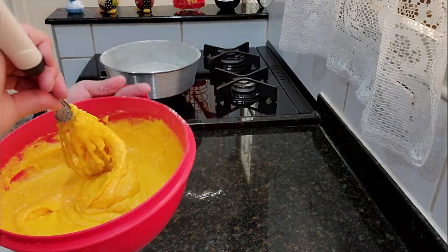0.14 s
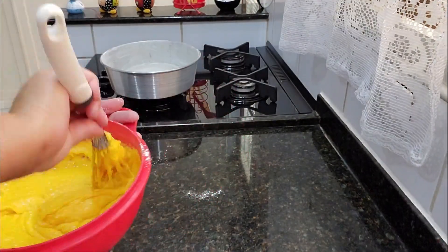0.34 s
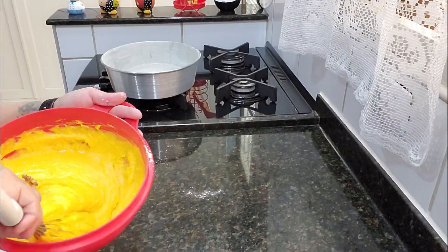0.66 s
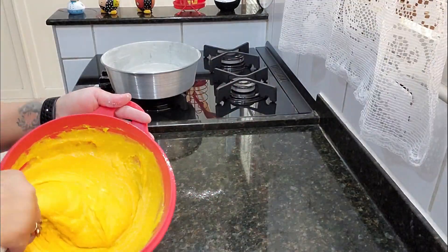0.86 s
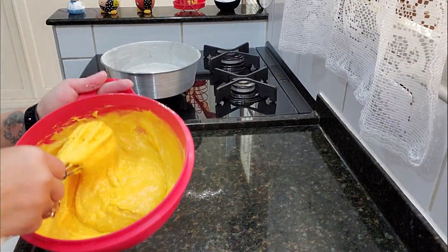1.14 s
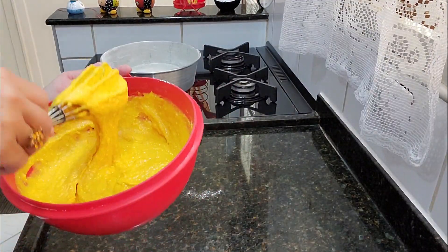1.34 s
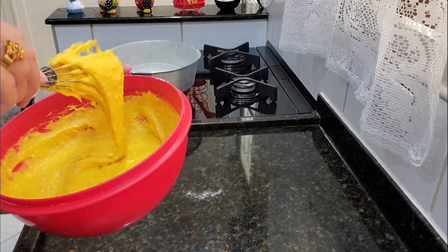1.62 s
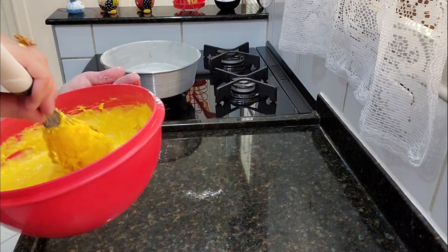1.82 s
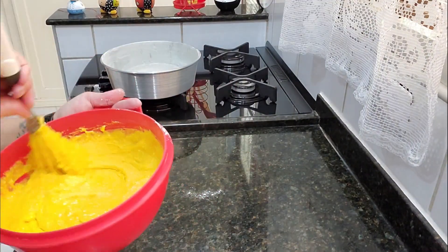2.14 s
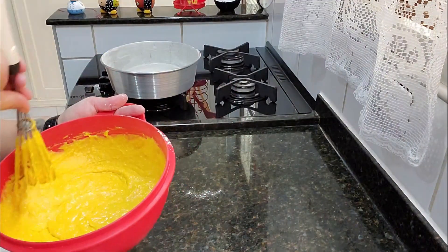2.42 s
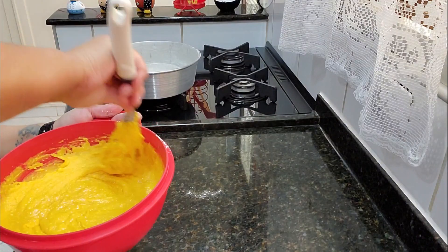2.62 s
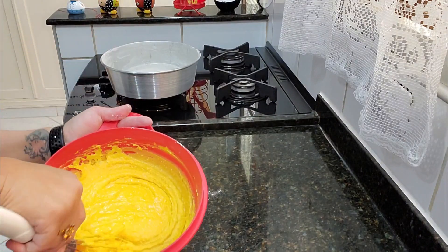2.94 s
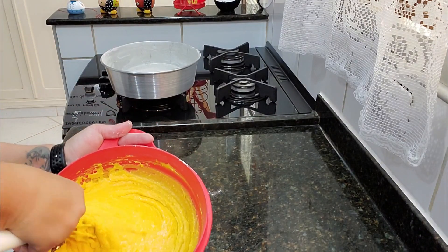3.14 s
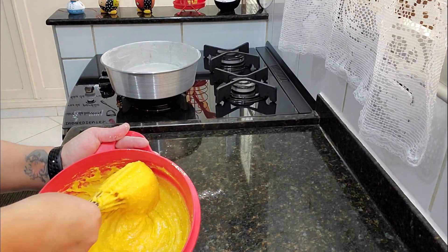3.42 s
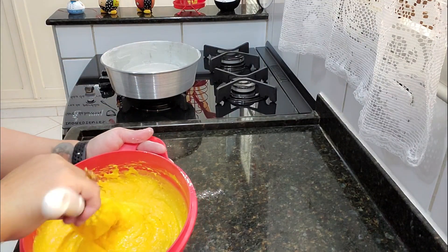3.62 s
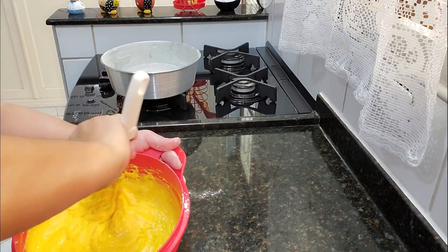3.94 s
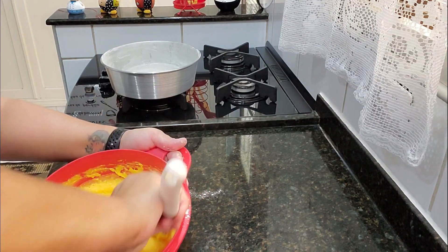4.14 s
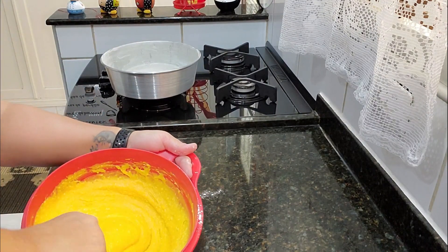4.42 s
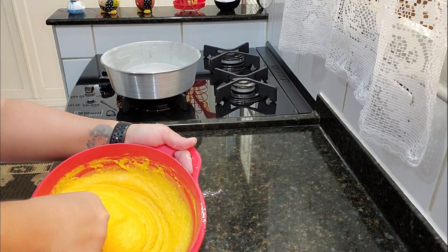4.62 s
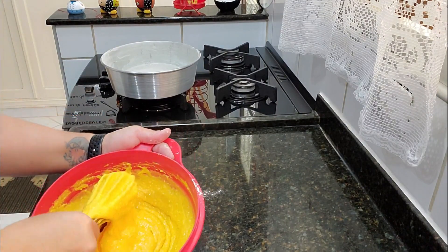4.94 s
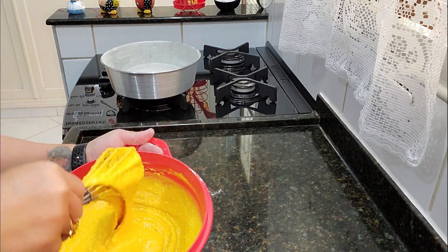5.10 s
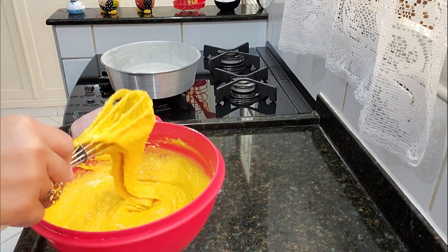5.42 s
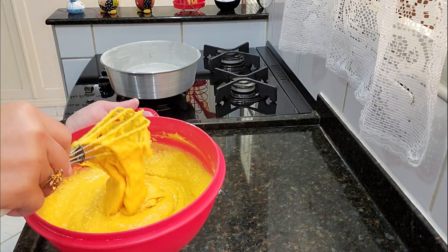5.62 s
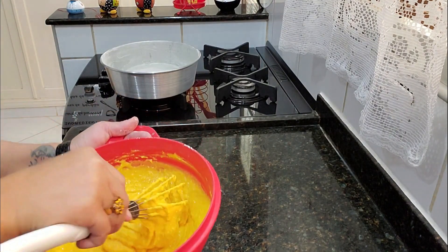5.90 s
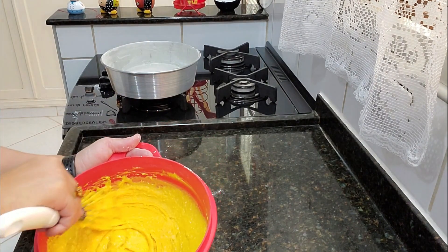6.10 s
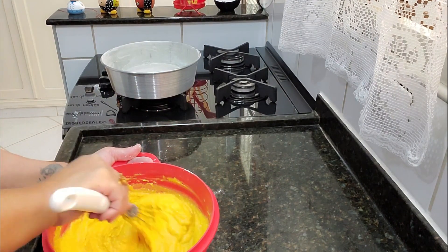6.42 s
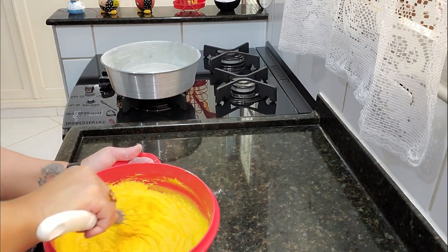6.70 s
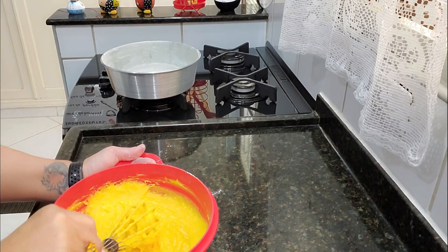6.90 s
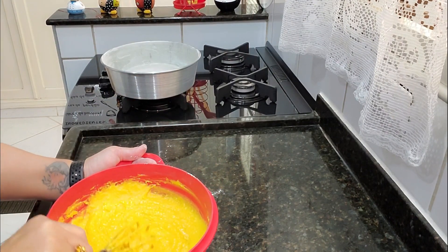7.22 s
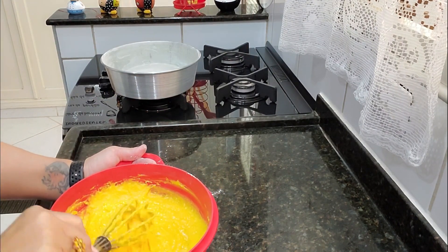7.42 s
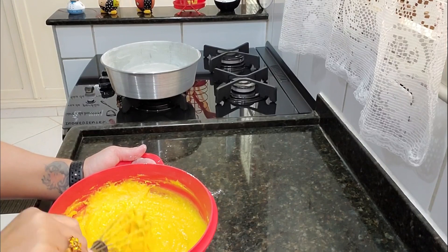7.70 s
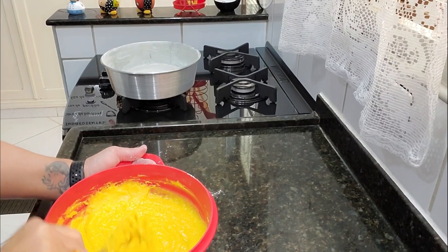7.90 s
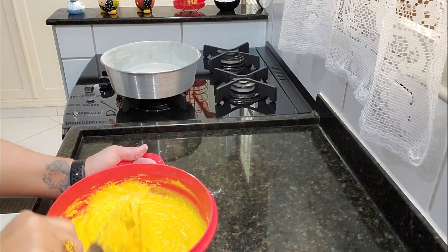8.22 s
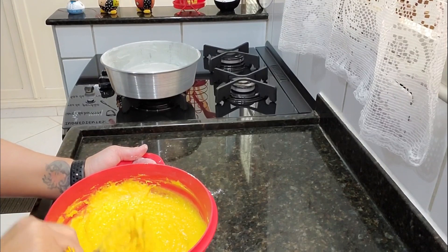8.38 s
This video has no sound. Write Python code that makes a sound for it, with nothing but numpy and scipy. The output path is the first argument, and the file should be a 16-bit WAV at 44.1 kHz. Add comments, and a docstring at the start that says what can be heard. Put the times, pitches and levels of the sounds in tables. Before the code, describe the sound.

Slow whisk scrapes and soft wet folds in a small tiled kitchen give way to quick rhythmic wire clacking and dull plastic bowl knocks.

```python
"""A wire whisk works thick batter in a plastic bowl, in a small tiled kitchen with a steady faint murmur.
First come slow strokes: random jerks, filtered, scrape the wall while batter folds, wires touch and a low hum
comes and goes. Now and then the bowl bumps the stone counter, a mix of decaying tones and noise; lumps plop.
The end is fast beating: wires clack on the wall about six times a second and the bowl knocks in between."""
import sys
import numpy as np
from scipy import signal
from scipy.fft import rfft, irfft, next_fast_len
from scipy.io import wavfile
from scipy.ndimage import uniform_filter1d, map_coordinates

SR = 44100
rng = np.random.default_rng(int(sys.argv[2]) if len(sys.argv) > 2 else 0)


def dump_mix(stems):
    """Bounce the given channels to the path in sys.argv[1] as a 16-bit WAV at rate SR."""
    frames = np.atleast_2d(stems).T  # one column per channel
    limited = np.clip(frames, -1, 1)  # hard clip at full scale
    pcm = np.round(limited * 32767).astype(np.int16)
    wavfile.write(sys.argv[1], SR, pcm)


N = 377055
TIME = np.arange(N) / SR  # seconds from the start
AGE = np.arange(SR * 3 // 4) / SR  # seconds since a short sound began

# Tone colour of a wire touching or ploughing through batter. Each row: frequency in Hz, level in dB per Hz.
TOUCH_COLOUR = [(200, -26), (900, -10), (1600, 0.5), (3200, -14), (4600, -21.5), (7000, -28), (15000, -32)]
# Tone colour of the high sizzle and spatter. Each row: frequency in Hz, level in dB per Hz.
SIZZLE_COLOUR = [(3000, -24.5), (6300, -4.5), (8200, -3), (11000, -4), (16000, -10)]
# Tone colour of wet batter being squeezed or peeling off. Each row: frequency in Hz, level in dB per Hz.
WET_COLOUR = [(150, -11), (380, 6), (700, 6.5), (1300, 2.5), (2200, -11), (4600, -19.5), (7000, -33),
              (15000, -24.5)]


def amp(db):
    """Turn decibels into a gain."""
    return 10 ** (np.asarray(db) / 20)


def unit(x):
    """Scale x to an average (rms) strength of 1."""
    return x / np.sqrt(np.mean(x ** 2) + 1e-20)


def along(points, hz):
    """Read a curve of (Hz, value) points, with frequency on a log axis."""
    f, v = np.transpose(points)
    return np.interp(np.log(hz + 1), np.log(f + 1), v)


def wobble(rate):
    """A smooth random curve through `rate` random points a second."""
    knots = rng.standard_normal(int(N * rate / SR) + 4)
    return map_coordinates(knots, [np.arange(N) * rate / SR])


def filtered(x, response):
    """Multiply each frequency in x by the gain that response(hz) gives."""
    n = x.shape[-1]
    m = next_fast_len(n + 8192)  # spare room for the filter's tail
    return irfft(rfft(x, m) * response(np.fft.rfftfreq(m, 1 / SR)), m)[..., :n]


def diffuse(pair, spectrum):
    """Mix two unrelated signals into coloured stereo of rms 1, near mono in the bass."""
    # How alike left and right are. Each row: frequency in Hz, likeness (1 is mono).
    alike = [(80, 0.8), (250, 0.8), (600, 0.26), (2000, 0.18), (6000, 0.038)]

    def mid_side_gains(hz):
        turn = np.arccos(np.clip(along(alike, hz), -1, 1)) / 2
        return amp(along(spectrum, hz)) * [np.cos(turn), np.sin(turn)]

    mid, side = filtered(pair, mid_side_gains)
    return unit(np.array([mid + side, mid - side]))


def noise(spectrum, size):
    """Coloured stereo noise of rms 1."""
    return diffuse(rng.standard_normal((2, size)), spectrum)


def pulse(spectrum, size):
    """The sharpest click with this colour that has nothing before its start (minimum phase), peak 1."""
    level = amp(along(spectrum, np.fft.rfftfreq(size, 1 / SR)))
    cepstrum = irfft(np.log(level), size)
    # folding the second half onto the first moves the energy as early as it can be
    cepstrum[1:size // 2] *= 2
    cepstrum[size // 2 + 1:] = 0
    p = irfft(np.exp(rfft(cepstrum)), size)
    return p / np.abs(p).max()


def fade(t60, attack):
    """Loudness shape of a blow: a quick rise, then a fall of 60 dB in t60 seconds."""
    return amp(-60 * AGE / t60) * (1 - np.exp(-AGE / attack))


def ring(hz, t60, attack):
    """One tone that rises quickly and dies away, like one vibration of a struck thing."""
    return np.sin(2 * np.pi * hz * AGE) * fade(t60, attack)


def add(track, s, sound):
    """Mix a short sound into the track at s seconds."""
    part = track[:, round(s * SR):][:, :len(AGE)]
    part += sound[..., :part.shape[1]]


def kitchen(x, wet_db, gap=0.0078):
    """Add the answer of the tiled walls: noise that swells over `gap` seconds, each pitch dying at its own speed."""
    # How long the room rings. Each row: frequency in Hz, time to fall by 60 dB in seconds.
    ring_times = [(70, 0.82), (200, 0.63), (1000, 0.53), (3000, 0.53), (8000, 0.46), (15000, 0.44)]
    flat_noise = noise([(20, 0), (20000, 0)], size=len(AGE))
    hz, t, z = signal.stft(flat_noise, SR, nperseg=256)
    dying = z * amp(-60 * t / along(ring_times, hz)[:, None])
    tail = signal.istft(dying, SR, nperseg=256)[1][:, :len(AGE)]
    tail = tail * (1 - np.exp(-(AGE / gap) ** 2))
    tail = tail / np.linalg.norm(tail[0])
    x = np.atleast_2d(x)
    return x + amp(wet_db) * signal.fftconvolve(x, tail, axes=1)[:, :x.shape[1]]


def knocks():
    """The heavy bowl lands and rocks back: a slow boom, the ring of its wall, a dull thud and a crack."""
    # Bumps on the counter. Each row: start in seconds, then relative levels in dB: whole knock, boom, crack.
    bumps = [(1.014, -34, -21, 0.5), (3.303, -9.5, -10.5, -16), (3.404, -26.5, -12, -14.5),
             (3.473, -22.5, -2.5, -15), (4.402, -31.5, -5.5, -7.5), (6.261, -6.5, -9, -14),
             (6.333, -11, -11.5, -13), (6.717, -9, -16, -14.5), (7.156, -8.5, -10, -16.5),
             (7.477, -16, -7, -14.5), (7.522, -14.5, -16, -22), (7.641, -5, -17, -13),
             (7.842, -13, -14, -24), (7.957, -21, -8, -15), (7.994, -11, -16, -21.5),
             (8.088, -5.5, -14.5, -15.5), (8.239, -12.5, -15, -17.5), (8.393, -12.5, -16, -14),
             (8.508, -22, -9, 13.5)]
    # Tones of the loaded bowl, before chance shifts. Each row: frequency in Hz, relative level in dB,
    # time to fall by 60 dB in seconds.
    modes = [(101.6, -1, 0.52), (125.8, 1, 0.28), (139, -9, 0.3), (190.2, -5.5, 0.32), (227.6, 0.5, 0.42),
             (259.7, 4.5, 0.24), (264.3, -2, 0.122), (304, 2, 0.14), (367.6, -3.5, 0.33),
             (424.5, -11, 0.05), (494.6, -4, 0.38), (565.5, -11.5, 0.64), (683, -16, 0.2), (841, -9, 0.15)]
    # How strongly a middling knock rings the wall. Each row: frequency in Hz, relative level in dB.
    wall_tilt = [(200, -8), (265, -11)]
    # Tone colours of thud and crack. Each row: frequency in Hz, level in dB per Hz.
    thud_colour = [(40, -43), (90, 7), (250, 2.5), (500, -2), (700, -6.5), (920, -7.5), (1100, -44.5),
                   (2500, -28.5), (8000, -60.5)]
    crack_colour = [(300, -32), (800, 5), (1300, 5.5), (2100, -2.5), (3000, -11), (5000, -17),
                    (6500, -24.5), (15000, -34.5)]
    middling_db, damping = -15.5, 0.17  # batter damps hard knocks more: dB of ring lost per dB of force
    rebound_s, rebound_db = 0.034, -17.5  # typical wait and relative level of the one rock back
    out, n = np.zeros((2, N)), len(AGE)
    for s, db, boom_db, crack_db in bumps:
        # each tone's strength and pitch vary by chance from knock to knock
        chance = rng.standard_normal((len(modes), 2))
        ring_db = -damping * (db - middling_db)
        wall = np.zeros(n)
        for k, ((hz, level, t60), (a, b)) in enumerate(zip(modes, chance)):
            strength = amp(level + along(wall_tilt, hz) + 1.22 * a)
            sign = (-1) ** k  # neighbouring tones start in opposite directions
            wall += sign * strength * ring(hz * (1 + 0.0077 * b), t60, attack=0.0024)
        rattle = unit(noise(thud_colour, size=n)[0] * fade(t60=0.11, attack=0.0015))
        thud = amp(-26) * rattle - amp(-11) * pulse(thud_colour, size=n)
        boom_hz = 75 * (1 + 0.048 * rng.standard_normal())
        boom = amp(boom_db + 13) * ring(boom_hz, t60=0.23, attack=0.0114)
        crack = amp(crack_db + 3) * noise(crack_colour, size=n) * fade(t60=0.036, attack=0.00097)
        landing = amp(ring_db - 2.5) * wall + boom + kitchen(thud + crack, wet_db=-0.5)
        add(out, s, amp(db) * landing)
        wait = rebound_s * np.exp(0.25 * rng.standard_normal())
        add(out, s + wait, amp(db + rebound_db) * thud)
    return out


def clacks():
    """A wire snaps on the wall amid a short burst of bright wire noise; the loops clink, the bowl thumps."""
    # Strikes on the wall. Each row: start in seconds, relative level in dB, relative clink level in dB.
    strikes = [(2.5002, -37, 3.5), (4.4016, -36, 6), (7.0981, -20, -19), (7.2698, -19.5, -3),
               (7.4104, -18, -1.5), (7.5731, -14.5, -2.5), (7.7255, -14.5, 0), (7.8863, -13.5, -1.5),
               (8.0409, -13.5, -1), (8.1936, -16, 0.5), (8.3522, -15, -2.5), (8.5077, -14, -2),
               (8.513, -18, -1.5)]
    # Tone colours of snap, bright wire noise and clink. Each row: frequency in Hz, level in dB per Hz.
    snap_colour = [(60, -28.5), (200, 17), (500, 22.5), (850, 12), (1200, 3.5), (2400, -9), (3300, -15),
                   (4800, 2), (6200, -19.5), (9000, -7.5), (16000, -27.5)]
    wire_colour = [(1000, -23.5), (3300, -8), (4700, -3.5), (6200, -6.5), (8000, -3), (10300, -1),
                   (13000, -6.5), (16000, -15)]
    clink_colour = [(900, -12.5), (1500, -9.5), (1900, 4.5), (2250, -2.5), (2800, -17), (5000, -44)]
    out, n = np.zeros((2, N)), len(AGE)
    for s, db, ring_db in strikes:
        snap = amp(4) * pulse(snap_colour, size=n) + amp(ring_db + 5.5) * pulse(clink_colour, size=n)
        snap = np.roll(snap, round(0.001415 * SR))  # the snap comes 1.4 ms after the noise sets in
        wires = amp(-32) * unit(noise(wire_colour, size=n) * fade(t60=0.021, attack=0.00062))
        clink = amp(ring_db - 30) * unit(noise(clink_colour, size=n) * fade(t60=0.046, attack=0.001))
        # the treble is heard mostly off the tiles
        tiles = kitchen(amp(-43) * unit(pulse(wire_colour, size=n)), wet_db=6.5)
        thump_hz = 85 * (1 + 0.087 * rng.standard_normal())
        thump = amp(10) * ring(thump_hz, t60=0.15, attack=0.02)  # the bowl's low answer
        # batter flung on the wall
        spatter = amp(-21) * noise(SIZZLE_COLOUR, size=n) * fade(t60=0.13, attack=0.0047)
        # the whisk ploughs on
        slosh = amp(-16.5) * noise(TOUCH_COLOUR, size=n) * fade(t60=0.17, attack=0.014)
        clack = kitchen(snap, wet_db=-3.5) + wires + clink + tiles + thump + spatter + slosh
        add(out, s, amp(db) * clack)
    return out


def scrapes():
    """Wires slip over the plastic in thousands of tiny jerks; a resonance moves with the place of contact."""
    # Tones of the wire loops when rubbed. Each row: frequency in Hz, relative level in dB.
    loop_tones = [(1918, -5.5), (2235, 10), (2385, 7.5), (2470, 11), (2555, 10), (3585, -8), (3700, -10.5)]
    # Tone colour of the scraping. Each row: frequency in Hz, level in dB per Hz.
    scrape_colour = [(250, -30.5), (700, -29), (1100, -11.5), (1600, -3), (2500, -2), (3100, 0.5),
                     (4200, -3), (5300, -2), (6500, -18), (10000, -36)]
    slips_per_s = 9000  # average number of jerks

    def loop_response(f):
        return 1 + sum(amp(db - 13.5) / (1 + ((f - hz) / 14) ** 2) for hz, db in loop_tones)

    db, centre_hz, sizzle_db = pushes()
    slips = rng.standard_normal((2, N)) * (rng.random(N) < slips_per_s / SR)
    slips = slips * amp(0.43 * wobble(130))
    hz, t, z = signal.stft(filtered(diffuse(slips, scrape_colour), loop_response), SR, nperseg=512)
    hz_column = hz[:, None]
    centre = np.interp(t, TIME, centre_hz * (1 + 0.07 * wobble(35)))
    gain = 1 + amp(8) / (1 + ((hz_column - centre) / 190) ** 2)  # the moving resonance
    gain = gain / np.sqrt(1 + (hz_column / (1.91 * centre)) ** 4)  # slow, low strokes are duller
    pressure_db = np.interp(t, TIME, np.clip(db, -48, -20)) + 33
    octaves = np.log2(np.clip(hz_column, 700, 6000) / 2000)
    gain = gain * amp(0.24 * pressure_db[None] * octaves)  # pressing brightens
    # even out the strength, so colour leaves the level alone
    weights = np.mean(np.abs(z[0]) ** 2, axis=1)
    gain = gain / np.sqrt(np.average(gain ** 2, axis=0, weights=weights))
    # random louder and softer patches in time and pitch
    patches = uniform_filter1d(rng.standard_normal(gain.shape), size=4, axis=0)
    patches = unit(uniform_filter1d(patches, size=4, axis=1))
    gain = gain * amp(3 * patches)
    rasp = unit(signal.istft(z * gain, SR, nperseg=512)[1][:, :N])
    sizzle = amp(sizzle_db + 2) * diffuse(slips, SIZZLE_COLOUR)
    # batter squeezed aside: above a low limit, no louder when pressed harder
    squish = amp(np.minimum(db + 0.5, -47)) * diffuse(slips, WET_COLOUR)
    heard = kitchen(amp(db) * (rasp + sizzle) + squish, wet_db=-6)
    return amp([[0.3], [-0.9]]) * heard  # left a little louder than right


def pushes():
    """Level, resonance and sizzle of the scraping: pushes swell, sag and let go; the stronger set more of the colour."""
    # Pushes along the wall. Each row: start in seconds, rise in seconds, hold in seconds, relative level in dB,
    # resonance in Hz, its glide in Hz per second, relative sizzle level in dB.
    strokes = [(0.495, 0.091, 0.086, -34, 2000, -1.5, -15.5),
               (0.649, 0.064, 0.12, -39.5, 1950, -1500, -16.5),
               (0.866, 0.069, 0.14, -45.5, 1450, -2.5, -14),
               (2.095, 0.047, 0.065, -42.5, 1700, 2501, -10.5), (2.157, 0.063, 0.039, -30, 1780, -1, -12),
               (2.517, 0.22, 0.17, -19, 2000, 1998.5, -15.5),
               (2.865, 0.055, 0.057, -29.5, 2300, -3000, -13.5),
               (2.991, 0.069, 0.072, -36, 1560, -1300, -16), (3.176, 0.13, 0.035, -37, 1850, -1000, -15.5),
               (4.09, 0.21, 0.11, -44.5, 1750, 1201.5, -17), (4.4, 0.17, .04, -48, 1650, -2, -19),
               (4.554, 0.062, 0.02, -40, 1500, -0.5, -23.5)]
    bite_db, sag_db_per_s, release_db_per_s = 29, 9, 202  # swell, easing while held, letting go
    t = TIME[::64]  # slow curves need few points
    start, rise, hold, level_db, hz, glide, sizzle_db = np.transpose(strokes)[..., None]
    age = t - start - rise
    held = np.clip(age, 0, hold)
    db = level_db - bite_db * np.minimum(age / rise, 0) ** 2
    db = db - sag_db_per_s * held - release_db_per_s * np.maximum(age - hold, 0)
    power = amp(db) ** 2 + 1e-14
    total = power.sum(axis=0)

    def blend(value):
        return (power * value).sum(axis=0) / total

    curves = (10 * np.log10(total), blend(hz + glide * held), blend(sizzle_db))
    return [np.interp(TIME, t, curve) for curve in curves]


def ticks():
    """A wire touches the wall, cushioned by batter: a very short burst of noise."""
    # Light touches. Each row: start in seconds, relative level in dB.
    touches = [(0.1696, -35), (0.5107, -35), (0.9464, -41.5), (1.0144, -36), (1.1642, -31.5), (1.2803, -35),
               (1.4208, -33), (2.1072, -40.5), (2.565, -20), (6.57, -29), (7.5245, -26.5)]
    out = np.zeros((2, N))
    for s, db in touches:
        touch = unit(noise(TOUCH_COLOUR, size=len(AGE)) * fade(t60=0.015, attack=0.00036))
        add(out, s, amp(db - 32) * kitchen(touch, wet_db=1.5))
    return out


def batter():
    """Thick batter folds over in soft lumps of noise that swell and settle, each with a faint hollow note."""
    # Folds. Each row: time of the crest in seconds, relative level in dB, hollow resonance in Hz.
    folds = [(.02, -50, 528.7), (.33, -48.5, 541), (0.948, -40, 580), (1.3, -44, 525), (2.251, -44, 543),
             (2.571, -40.5, 586), (2.96, -39.5, 588), (3.43, -42, 571), (4.02, -48, 587), (4.501, -40, 589),
             (5.03, -49, 604), (5.4, -51, 545.8), (5.65, -52.5, 559)]
    # Tone colour of the folding. Each row: frequency in Hz, level in dB per Hz.
    fold_colour = [(100, -15.5), (280, -1), (400, -4.5), (490, 0.5), (580, -2), (750, -9), (1200, -28),
                   (3000, -29.5), (8000, -58)]
    rise_s, fall_s = 0.09, 0.17  # how slowly a fold swells and settles
    crest, level_db, note_hz = np.transpose(folds)[..., None]
    t = TIME[::64]  # slow curves need few points
    pace = np.where(t < crest, rise_s, fall_s)
    power = (amp(level_db) / np.cosh((t - crest) / pace)) ** 2
    total = power.sum(axis=0)
    swell = np.interp(TIME, t, np.sqrt(total))
    hz = np.interp(TIME, t, (power * note_hz).sum(axis=0) / total)
    phase = 2 * np.pi * np.cumsum(hz) / SR
    hollow = unit(wobble(55) * np.sin(phase) + wobble(55) * np.cos(phase))
    lumps = amp(-6.5) * noise(fold_colour, size=N) + amp(-8) * hollow
    return swell * amp(1.8 * wobble(16)) * lumps


def plops():
    """A soft lump of batter peels off the whisk with a wet crackle of random tiny clicks."""
    # Drops from the whisk. Each row: start in seconds, relative level in dB.
    drops = [(1.17, -57), (1.3, -55), (1.6, -49), (3.65, -55), (4.61, -41), (5.045, -54), (5.346, -52.5),
             (5.622, -54), (6.18, -54.5)]
    clicks_per_s = 700  # average
    out = np.zeros((2, N))
    for s, db in drops:
        bubbles = rng.standard_normal((2, len(AGE))) * (rng.random(len(AGE)) < clicks_per_s / SR)
        add(out, s, amp(db) * diffuse(bubbles, WET_COLOUR) * fade(t60=0.47, attack=0.0078))
    return kitchen(out, wet_db=-0.5)


def hum():
    """A low tone and its octave swell and waver in pitch and strength: a hum, and at last the bowl's low ringing."""
    # Swells of the low hum; the last, at 3.52 s, is the bowl's low ringing after a knock.
    # Each row: start in seconds, length in seconds, pitch in Hz at the middle (before wavering),
    # relative level of the low tone in dB, relative level of the octave in dB.
    swells = [(0, .16, 58.7, -44, -39), (0.233, 0.095, 60, -56.5, -40), (.33, 0.17, 60.5, -39, -47),
              (0.538, 0.22, 65, -34, -49), (0.856, 0.19, 62, -36.5, -54), (1.144, 0.65, 70, -31, -46.5),
              (1.802, 0.16, 69, -38, -51), (2.614, 0.23, 69, -42.5, -53), (2.874, 0.22, 65.5, -35, -51),
              (3.52, 0.135, 73, -33.5, -48)]
    edge_s, rise_hz_per_s = 0.025, 7  # soft fade in and out; the pitch creeps up
    out = np.zeros(N)
    waver = 1 + 0.013 * wobble(5.1)
    low, octave = amp(0.58 * wobble(20)), amp(1.5 * wobble(14.5))
    for start, length, hz, low_db, octave_db in swells:
        from_middle = TIME - start - length / 2
        gate = 0.5 + 0.5 * np.tanh((length / 2 - np.abs(from_middle)) / edge_s)
        phase = 2 * np.pi * np.cumsum((hz + rise_hz_per_s * from_middle) * waver) / SR
        low_tone = amp(low_db) * low * np.sin(phase)
        octave_tone = amp(octave_db) * octave * np.sin(2 * phase)
        out += gate * (low_tone + octave_tone)
    return np.sqrt(2) * out  # a plain sine has rms 1 after this


def background():
    """The room's murmur, a faint appliance drone and a thin high whine, all made of coloured noise."""
    # Tone colour of the quiet room. Each row: frequency in Hz, level in dB per Hz.
    murmur_colour = [(15, -31.5), (25, 0), (105, 6), (195, -12.5), (256, -6), (335, -9), (545, -9.5),
                     (1160, -29), (1370, -29), (3250, -47.5), (4370, -34), (5730, -47.5), (8590, -40),
                     (10100, -34), (16000, -45)]
    drone_colour = [(225, -75.5), (246, 5.5), (258, -1), (280, -65.5)]
    whine_colour = [(9000, -54.5), (9750, -22.5), (10000, 0), (10250, -26), (11600, -11), (13000, -52.5)]
    drone = amp(-56.5) * noise(drone_colour, size=N)
    whine = amp(-71) * noise(whine_colour, size=N)
    murmur = amp(-47) * noise(murmur_colour, size=N)
    return murmur + drone + whine


def scene():
    """Everything heard from above the counter."""
    return knocks() + clacks() + ticks() + plops() + scrapes() + batter() + hum() + background()


def record(dry):
    """The microphone sheds the deepest bass; the recorder clips at full scale and has a band limit."""
    bass_cut = signal.butter(3, 45, "highpass", fs=SR, output="sos")
    lean = signal.sosfilt(bass_cut, dry)
    top_hz = 16000
    return filtered(np.clip(lean, -1, 1), lambda hz: hz < top_hz)


dry = scene()
out = record(dry)
dump_mix(out)
```